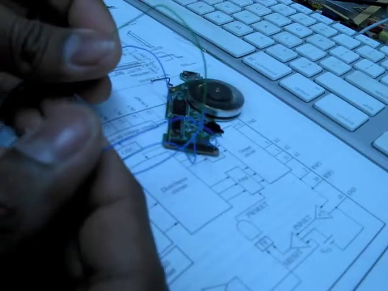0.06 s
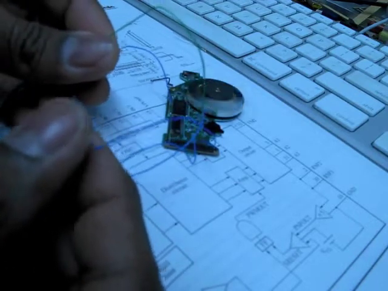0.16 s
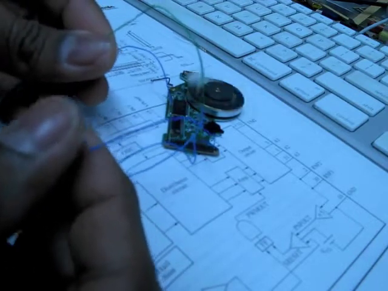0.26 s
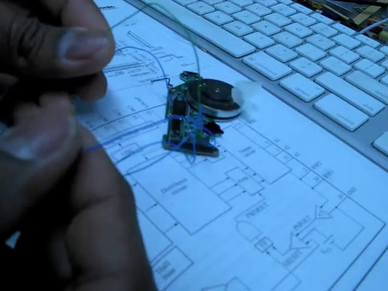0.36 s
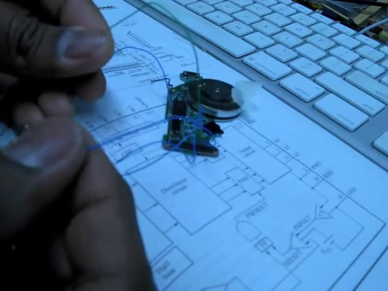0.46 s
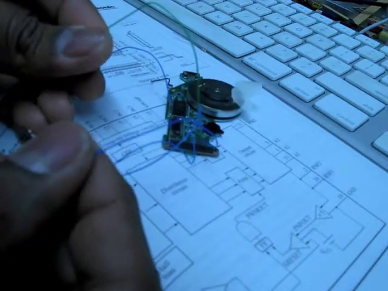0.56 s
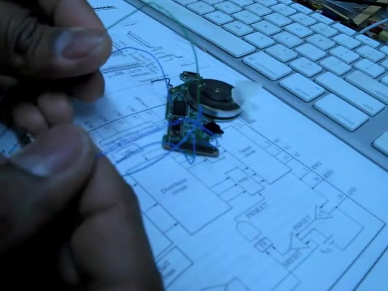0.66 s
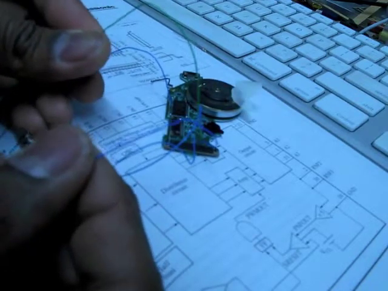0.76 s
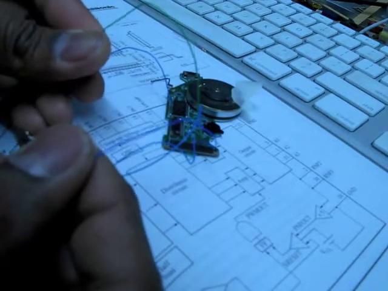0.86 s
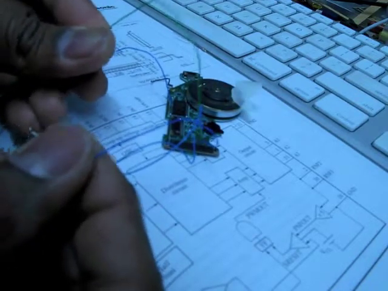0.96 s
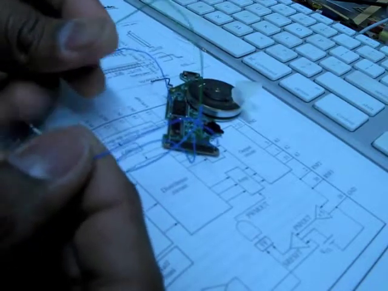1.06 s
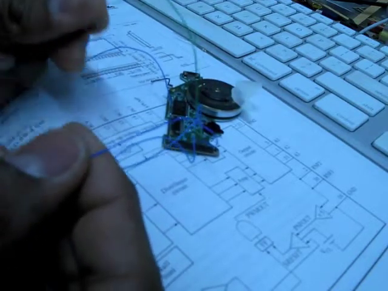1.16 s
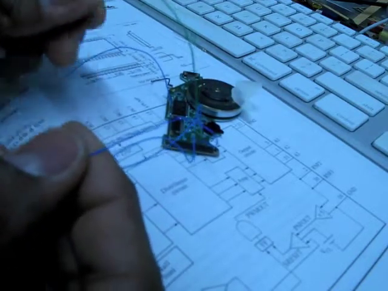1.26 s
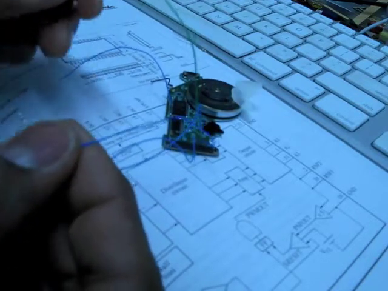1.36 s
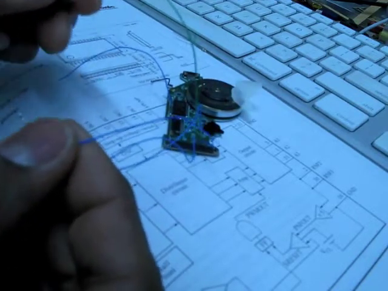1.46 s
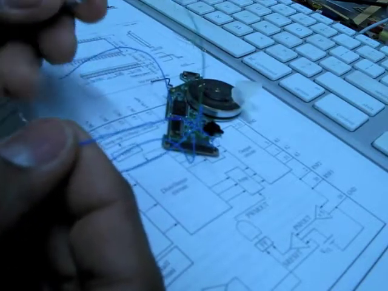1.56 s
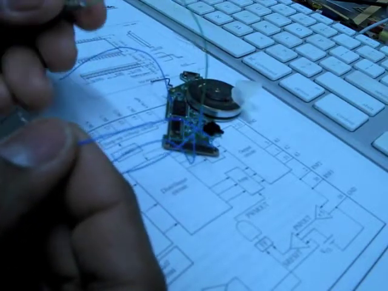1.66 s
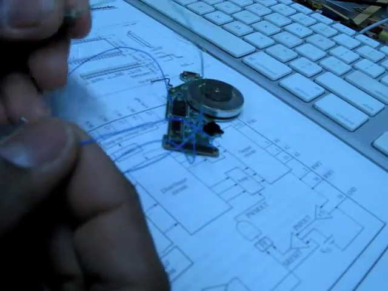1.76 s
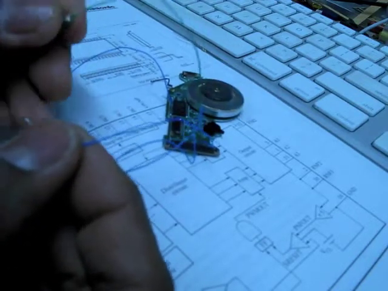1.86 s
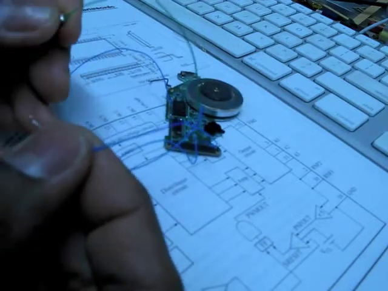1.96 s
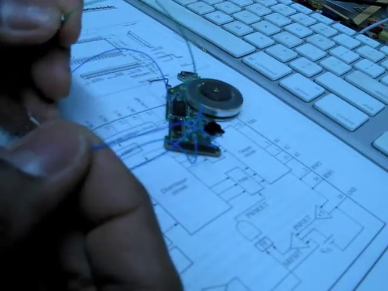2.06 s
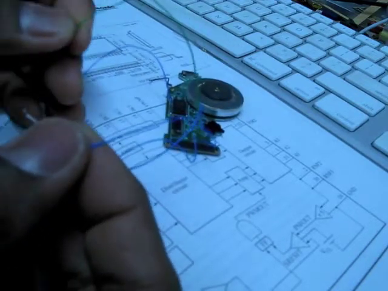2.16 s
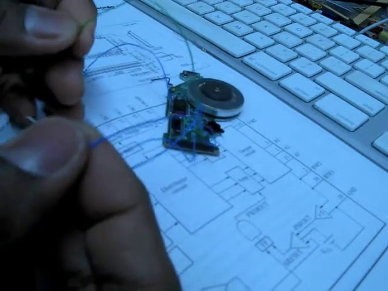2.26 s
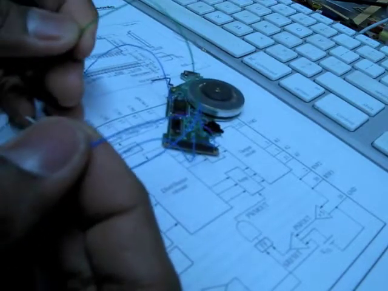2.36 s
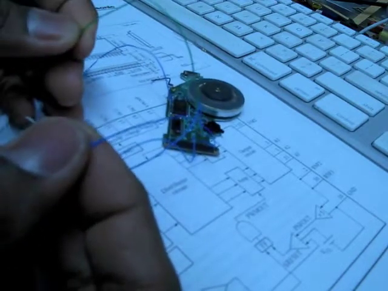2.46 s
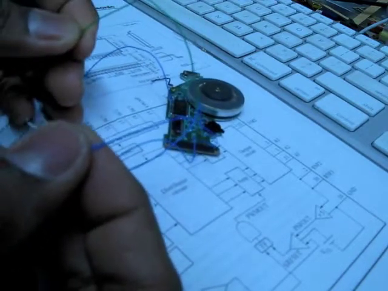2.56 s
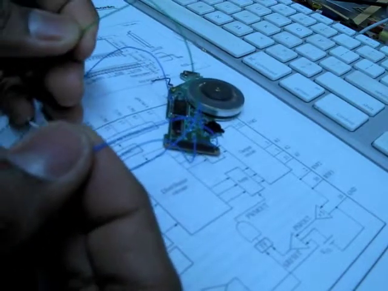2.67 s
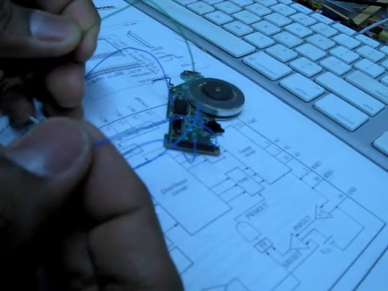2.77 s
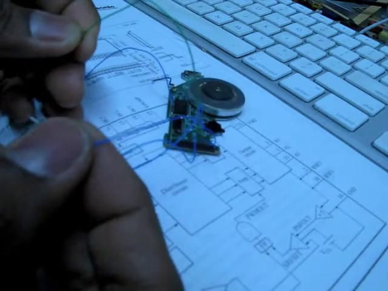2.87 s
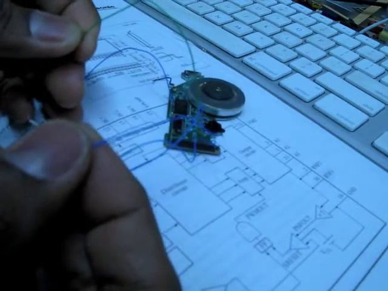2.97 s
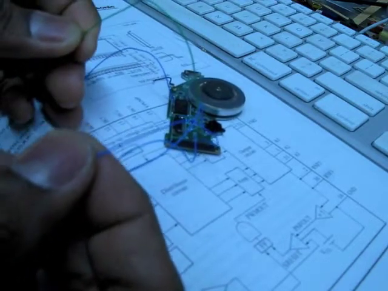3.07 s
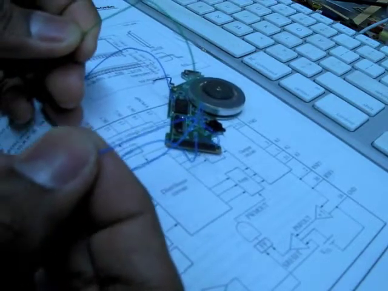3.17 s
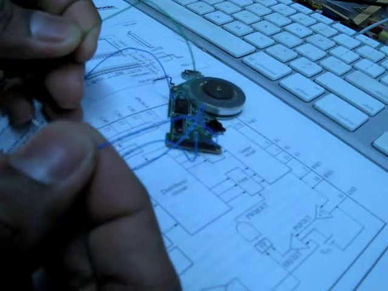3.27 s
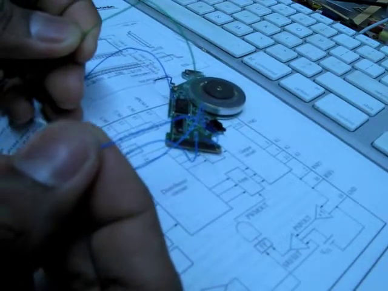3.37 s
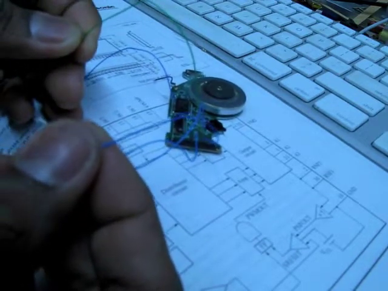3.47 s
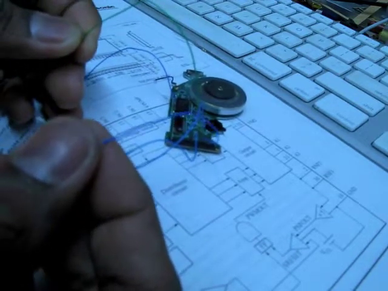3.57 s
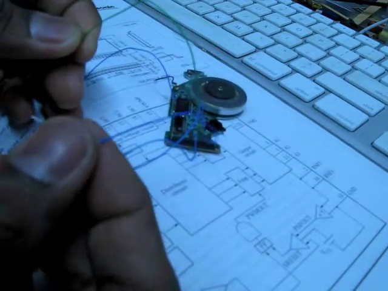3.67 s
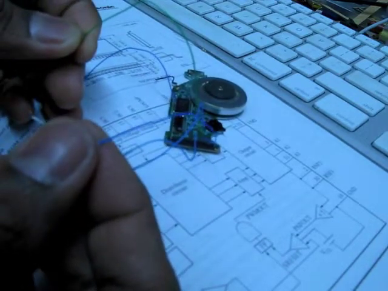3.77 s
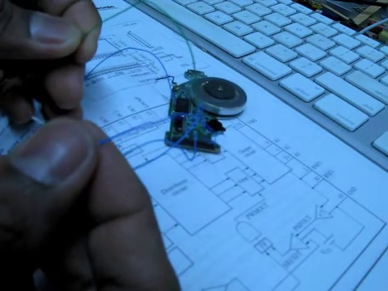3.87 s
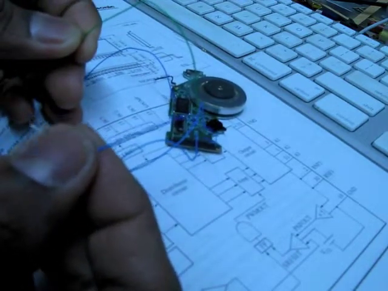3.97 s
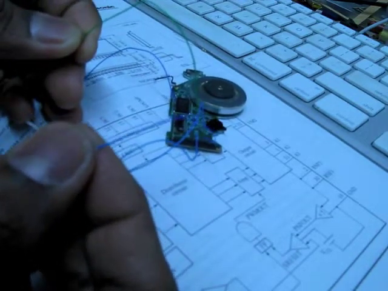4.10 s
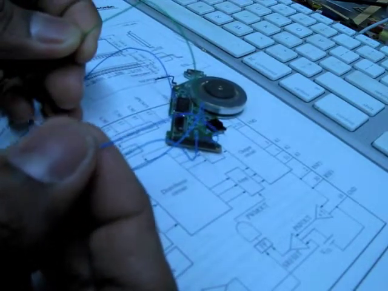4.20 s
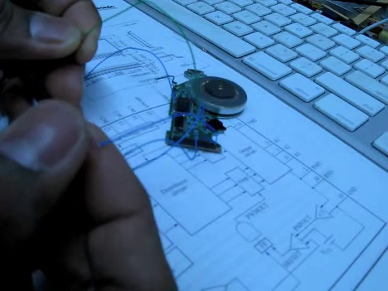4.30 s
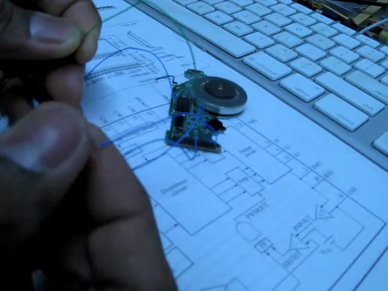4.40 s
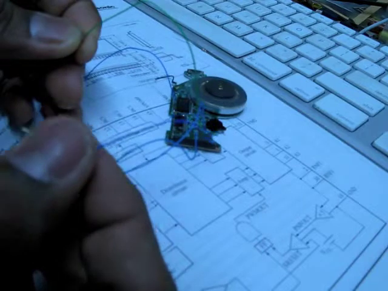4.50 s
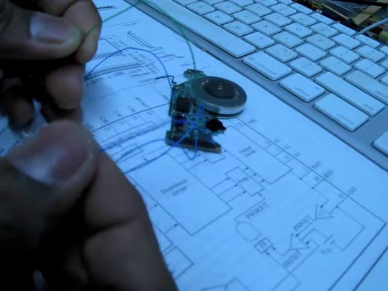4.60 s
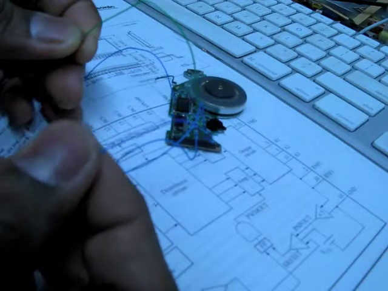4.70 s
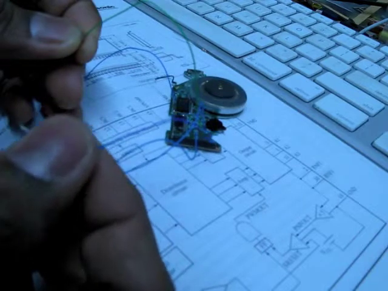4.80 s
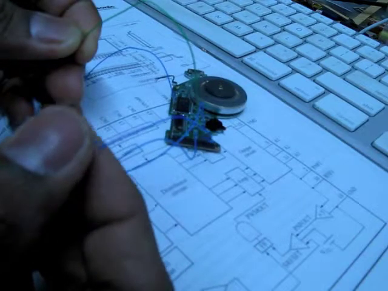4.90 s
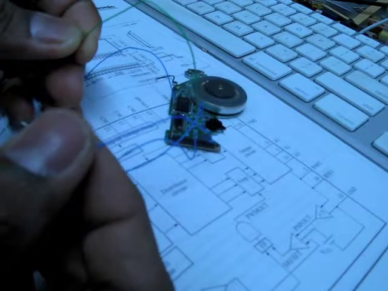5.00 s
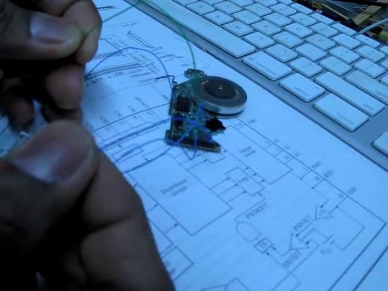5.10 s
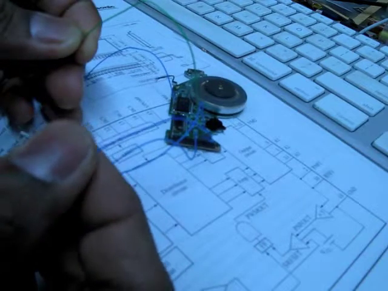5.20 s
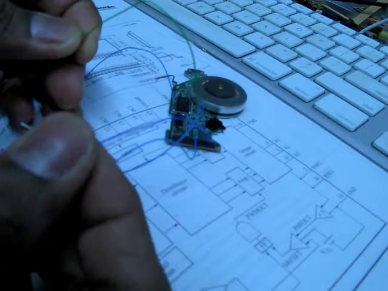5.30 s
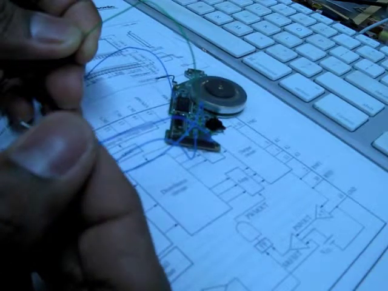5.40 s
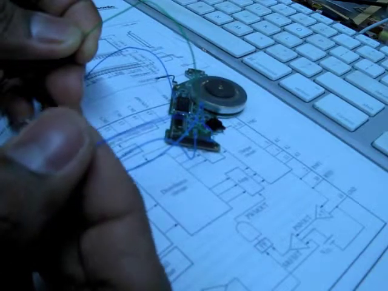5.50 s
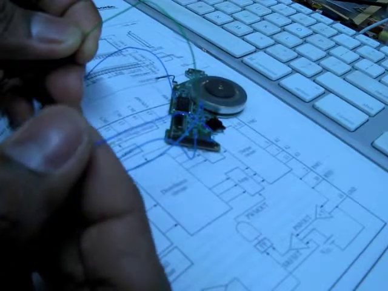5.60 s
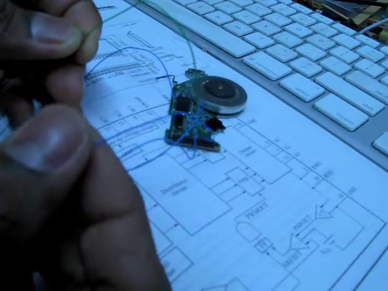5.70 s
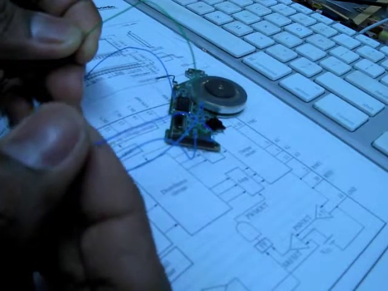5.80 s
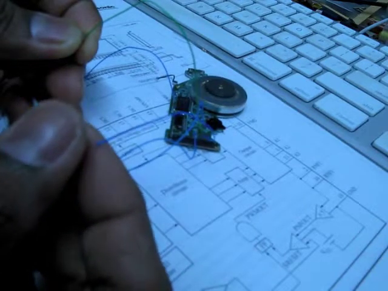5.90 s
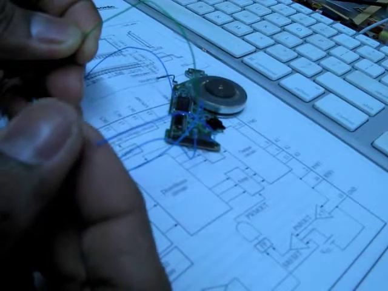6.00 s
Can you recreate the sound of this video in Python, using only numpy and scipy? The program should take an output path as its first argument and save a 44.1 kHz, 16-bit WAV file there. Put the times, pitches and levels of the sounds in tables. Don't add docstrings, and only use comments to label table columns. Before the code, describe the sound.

Faint ticks and a brush of paper, then a small bare motor gives four shrill, buzzing whines with brief gaps, close up.

```python
import sys
import numpy as np
from scipy import signal
from scipy.fft import rfft, irfft, next_fast_len
from scipy.io import wavfile
from scipy.ndimage import map_coordinates

SR = 44100
rng = np.random.default_rng(int(sys.argv[2]) if len(sys.argv) > 2 else 0)


def makeup_ratio(level_db):
    decades = np.asarray(level_db, float) / 20
    return 10 ** decades


def unload_wav(signal):
    wavfile.write(
        sys.argv[1],
        SR,
        np.round(np.clip(np.atleast_2d(signal).T, -1, 1) * 32767).astype(np.int16),
    )


N = 266805
FULL_SPEED = 93.2

# power on in seconds, power off in seconds.
RUNS = [
    (1.739, 2.285),
    (2.385, 3.5245),
    (3.805, 4.281),
    (4.497, 6.06),
]
COGGING = [18]
SLOTS = [54, 90, 126, 130, 138, 156, 167]
STEPS = [36, 72, 108]
WINDING = [9, 17, 24, 30, 42, 48, 60, 66, 78, 98, 132, 150]
RINGING = [81, 84, 113, 116, 119, 124]


def motor():
    t = np.arange(N) / SR
    speed, torque_db, chop_db = controller()
    powered = sum((t > on) * (t < off) for on, off in RUNS)
    spin = (t > RUNS[0][0]) * speed / 90
    angle = 2 * np.pi * np.cumsum(speed) / SR + 0.003 * wobble(40)
    force = cogging(spin, angle) + slots(spin, angle) + commutation(spin, angle, torque_db)
    force = force + winding(spin, angle, torque_db) + bell_ringing(spin, angle, torque_db)
    force = force + faults(spin, angle, torque_db) + switching_noise(angle, chop_db)
    force = powered * force + knocks()
    return filtered(force, body) + unbalance(spin, angle) + air_drag(spin)


def controller():
    # start in seconds, drive as the speed it would settle at in turns per s (also drag in coasting).
    drive_steps = [(1.739, 83.2), (1.774, 132.1), (2.002, 106.6), (2.192, 71.8), (2.285, 66.9),
                   (2.385, 89.8), (2.444, 108.5), (2.536, 101.6), (2.756, 77.8), (2.854, 86.2),
                   (2.956, 101.0), (3.064, 92.2), (3.29, 100.5), (3.371, 77.9), (3.525, 57.8),
                   (3.805, 82.1), (3.866, 122.2), (3.97, 100.9), (4.135, 71.8), (4.204, 81.2),
                   (4.281, 59.5), (4.497, 127.4), (4.58, 100.1), (4.806, 72.0), (4.866, 81.2),
                   (5.03, 102.4), (5.09, 95.9), (5.45, 77.1), (5.588, 82.4), (5.96, 84.5)]
    # drive in turns per s, torque in dB.
    torque_curve = [(70, -11.5), (83, -6), (89, -2), (92, -1.5), (130, 3)]
    # switching level at power on in dB, rise time in seconds.
    soft_starts = [
        (-19, 0.013),
        (-1, 0.12),
        (-2.5, 0.066),
        (-2.5, 0.12),
    ]
    inertia_s, first_jerk = 0.25, 9
    behind, catch_up_db = 11, -3.5
    t = np.arange(N) / SR
    starts, levels = np.transpose(drive_steps)
    drive = np.append(0, levels)[np.searchsorted(starts, t)]
    since = [np.where(t > on, t - on, np.inf) for on, off in RUNS]
    speed = lag(drive, inertia_s) + first_jerk * np.exp(-since[0] / inertia_s)
    wanted_db = np.interp(drive, *np.transpose(torque_curve))
    wanted_db = np.where(drive - speed > behind, np.maximum(wanted_db, catch_up_db), wanted_db)
    torque_db = lag(wanted_db, 0.012)
    soft_db = sum(db * np.exp(-d / rise) for d, (db, rise) in zip(since, soft_starts))
    chop_db = -53 - 0.17 * torque_db + soft_db
    return speed, torque_db, chop_db


def cogging(spin, angle):
    levels_db = [-52.5]
    # time in seconds, level in dB.
    seat = [
        (1.74, -10),
        (2.3, -1),
        (2.5, 0),
        (3.3, -1),
        (3.5, -3),
        (5.6, -4),
        (6.05, 5),
    ]
    return spin ** 5 * makeup_ratio(curve(seat)) * orders(COGGING, levels_db, angle, sway_db=0.0)


def slots(spin, angle):
    levels_db = [-59.5, -61, -62, -63, -65, -68, -59]
    return spin ** 0.3 * orders(SLOTS, levels_db, angle, sway_db=3.5)


def commutation(spin, angle, torque_db):
    levels_db = [-50, -54.5, -66]
    return spin ** 0.4 * makeup_ratio(torque_db) * orders(STEPS, levels_db, angle, sway_db=2.2)


def winding(spin, angle, torque_db):
    levels_db = [-64, -61, -61, -57.5, -57.5, -57, -56.5, -55.5, -59, -63, -63, -64]
    return spin ** 4 * makeup_ratio(0.65 * torque_db) * orders(WINDING, levels_db, angle, sway_db=1.5)


def bell_ringing(spin, angle, torque_db):
    levels_db = [-59, -45, -54, -38.5, -39, -53]
    beat = (1 + 0.55 * np.cos(angle)) * makeup_ratio(0.55 * torque_db)
    return spin ** 4 * beat * orders(RINGING, levels_db, angle, sway_db=1.2)


def faults(spin, angle, torque_db):
    # frequency in Hz, gain in dB.
    fault_colour = [(200, -120), (500, 3), (3000, -1), (6000, -4), (8500, 7), (11000, 8), (13500, 9),
                    (16000, 1)]
    order = np.arange(2049)
    others = (order < 190) & ~np.isin(order, COGGING + SLOTS + STEPS + WINDING + RINGING)
    phases = rng.uniform(0, 2 * np.pi, len(order))
    pattern = unit(irfft(others * np.exp(1j * phases)))
    turn = angle / (2 * np.pi) % 1
    pull = np.interp(turn, np.arange(4097) / 4096, np.append(pattern, pattern[0]))
    return makeup_ratio(-53.5 + 0.13 * torque_db) * spin * filtered(pull, colour(fault_colour))


def switching_noise(angle, chop_db):
    # frequency in Hz, density in dB per Hz.
    board_colour = [(200, -120), (400, 12.5), (1500, -10.5), (3000, 3), (5000, 0.5), (9500, 2),
                    (12000, 1.5), (16000, -1.5)]
    chop = makeup_ratio(chop_db + 0.9 * wobble(12))
    groups = 1 + 0.073 * np.cos(3 * angle) + 0.26 * np.cos(angle)
    return makeup_ratio(7.0) * chop * groups * noise(colour(board_colour))


def knocks():
    # time in seconds, peak in dB.
    hits = [
        (1.739, -40),
        (1.7835, -34),
        (1.8254, -41),
        (1.851, -38),
        (2.3865, -47),
        (3.8067, -43),
        (4.4977, -37),
    ]
    return bursts(hits, t60=0.007)


def unbalance(spin, angle):
    once = makeup_ratio(-66.5 + 3.6 * wobble(8)) * np.sin(angle)
    twice = makeup_ratio(-69.5 + 3.4 * wobble(4.42)) * np.sin(2 * angle)
    return spin ** 4 * (once + twice)


def air_drag(spin):
    # frequency in Hz, density in dB per Hz.
    wind_colour = [(500, -120), (900, 4), (1800, 8.5), (4000, 7.5), (8000, 4.5), (12000, 0.5), (16000, -15)]
    return makeup_ratio(-53.0) * spin * noise(colour(wind_colour))


def body(f):
    # frequency in Hz, width in Hz, level in dB.
    plate_modes = [(717, 110, 2.5), (1501, 42, 4.5), (1610, 160, 1), (1980, 450, -1), (4265, 30, -4.5),
                   (6020, 470, -0.5)]
    # frequency in Hz, width in Hz, level in dB.
    bell_modes = [(7810, 360, 5.5), (10950, 1000, 10), (11130, 710, 9.5), (15580, 440, 13.5)]
    plate = 1 + sum(makeup_ratio(db) * resonance(f, hz, width) for hz, width, db in plate_modes)
    bell = sum(makeup_ratio(db) * resonance(f, hz, width) ** 2 for hz, width, db in bell_modes)
    return (plate + bell) * (1j * f / (950 + 1j * f)) ** 2


def orders(multiples, levels_db, angle, sway_db):
    total = 0
    for k, db in zip(multiples, levels_db):
        level = makeup_ratio(db + sway_db * wobble(14)) / abs(body(k * FULL_SPEED))
        total = total + level * np.sin(k * angle + rng.uniform(0, 2 * np.pi))
    return total


def walls(x):
    t = np.arange(SR // 3) / SR
    tail = rng.standard_normal(SR // 3) * makeup_ratio(-60 * t / 0.25)
    return signal.fftconvolve(x, tail / np.linalg.norm(tail))[:N]


def room():
    # frequency in Hz, density in dB per Hz.
    room_colour = [(18, -63), (30, -30), (90, -9), (112, -4.5), (179, -4), (227, -4), (404, -4),
                   (449, -4.5), (988, -5.5), (1860, -9.5), (2060, -10), (8080, -18), (16000, -25.5)]
    return makeup_ratio(-52 + wobble(2.91) / 3) * noise(colour(room_colour)) + fan_hum() + paper()


def fan_hum():
    # frequency in Hz, width in Hz, level in dB.
    hum_tones = [(119.65, 3.7, -68.5), (240.1, 6.7, -69)]
    return sum(makeup_ratio(db) * noise(lambda f: resonance(f, hz, width) ** 2) for hz, width, db in hum_tones)


def paper():
    # time in seconds, peak in dB.
    wire_ticks = [
        (0.4034, -47),
        (0.9744, -49),
        (1.0016, -43),
        (1.068, -42),
        (1.1094, -46),
        (1.5094, -42),
        (1.6144, -42),
    ]
    # time in seconds, peak in dB.
    finger = [
        (1.095, -44),
        (1.115, -45),
        (1.135, -47),
    ]
    ticks = makeup_ratio(-4) * filtered(bursts(wire_ticks, t60=0.015), lambda f: resonance(f, 12000, 9000))
    return ticks + filtered(bursts(finger, t60=0.16), lambda f: resonance(f, 2000, 2500))


def bursts(events, t60):
    out, t = np.zeros(N + SR), np.arange(SR // 20) / SR
    for start, db in events:
        puff = makeup_ratio(db - 60 * t / t60) * rng.standard_normal(len(t))
        out[round(start * SR):][:len(t)] += puff
    return out[:N]


def noise(response):
    return unit(filtered(rng.standard_normal(N), response))


def resonance(f, hz, width):
    return 1j * f * width / (hz * hz - f * f + 1j * f * width)


def colour(points):
    hz, db = np.transpose(points)
    return lambda f: makeup_ratio(np.interp(np.log(f + 1), np.log(hz), db))


def filtered(x, response):
    m = next_fast_len(N + SR // 2)
    return irfft(rfft(x, m) * response(np.fft.rfftfreq(m, 1 / SR)), m)[:N]


def lag(x, seconds):
    keep = np.exp(-1 / (seconds * SR))
    return signal.lfilter([1 - keep], [1, -keep], x)


def wobble(rate):
    knots = rng.standard_normal(int(N * rate / SR) + 4)
    return map_coordinates(knots, [np.arange(N) * rate / SR])


def curve(rows):
    return np.interp(np.arange(N) / SR, *np.transpose(rows))


def unit(x):
    return x / np.sqrt(np.mean(x ** 2) + 1e-20)


def scene():
    near = motor()
    return (near + makeup_ratio(-11.5) * walls(near) + room())[None]


def band_limit(x):
    return signal.sosfilt(signal.butter(12, 16870, fs=SR, output="sos"), x)


def record(dry):
    heard = filtered(dry[0], lambda f: (f < 15740) * 1j * f / (40 + 1j * f))
    return band_limit(heard[None])


dry = scene()
out = record(dry)
unload_wav(out)
```